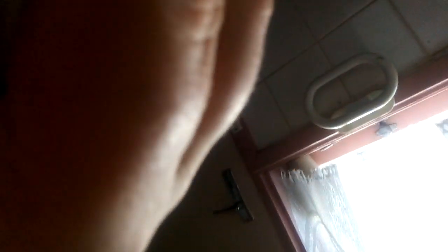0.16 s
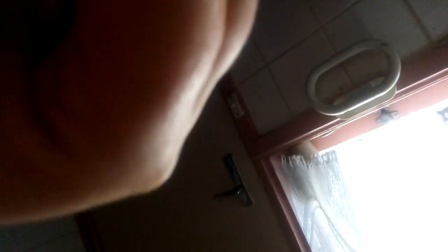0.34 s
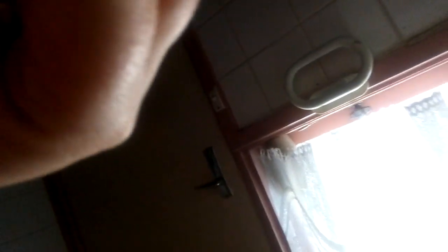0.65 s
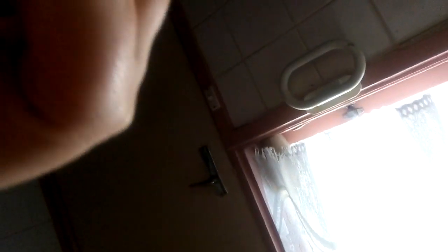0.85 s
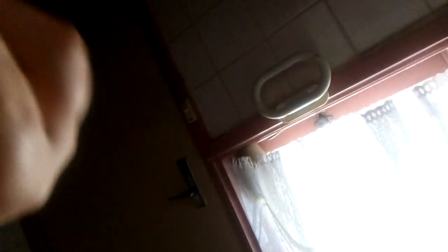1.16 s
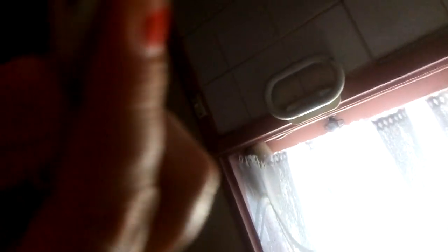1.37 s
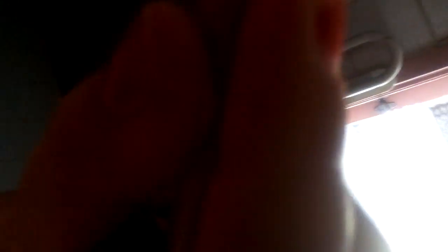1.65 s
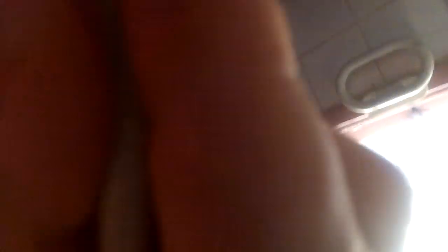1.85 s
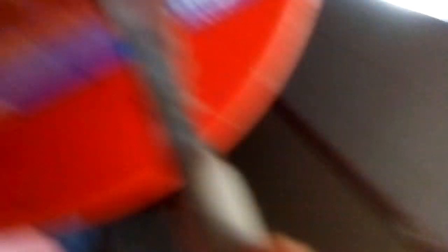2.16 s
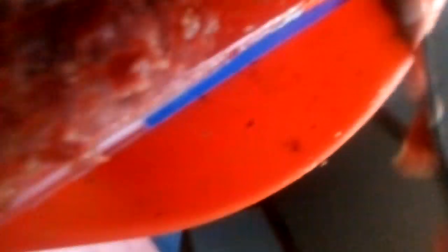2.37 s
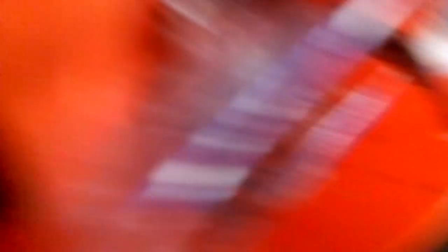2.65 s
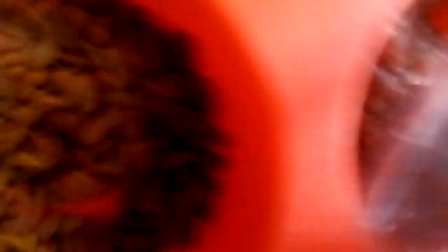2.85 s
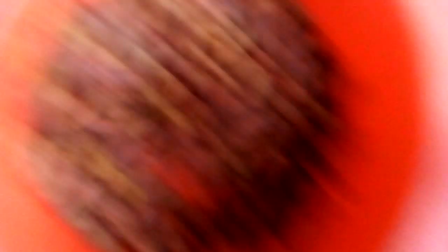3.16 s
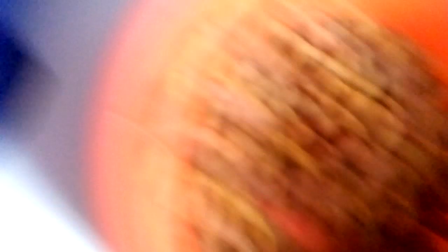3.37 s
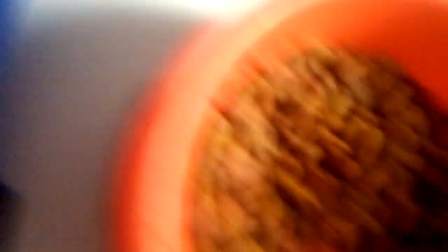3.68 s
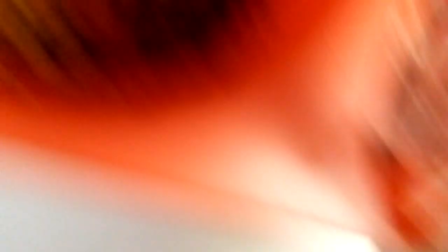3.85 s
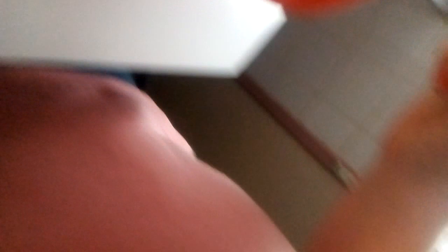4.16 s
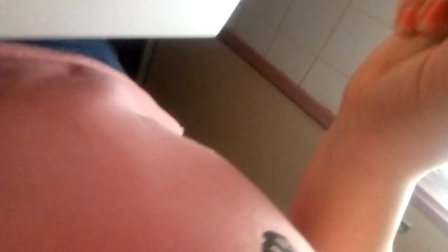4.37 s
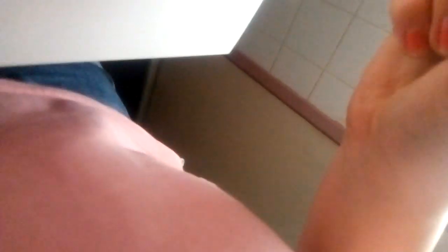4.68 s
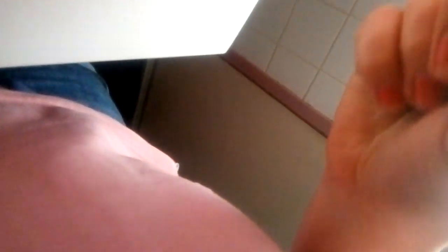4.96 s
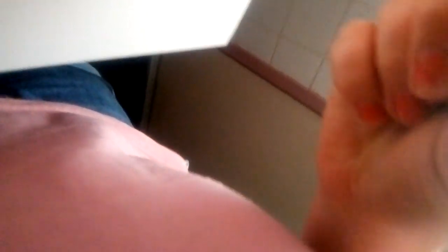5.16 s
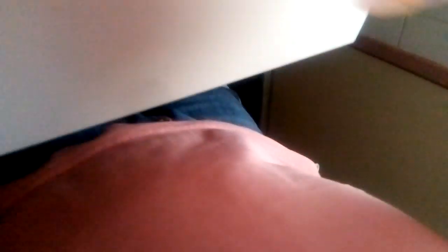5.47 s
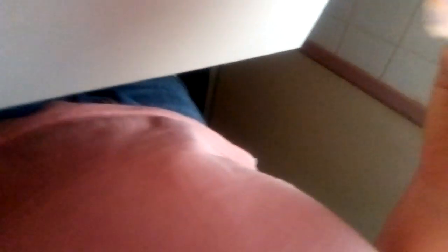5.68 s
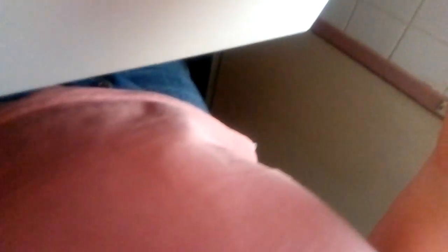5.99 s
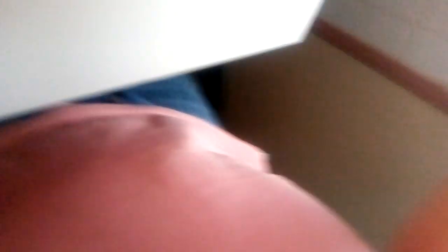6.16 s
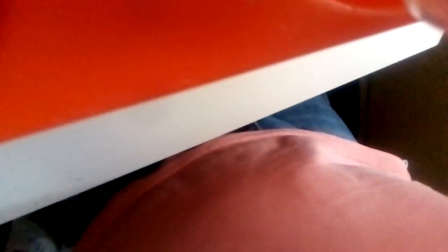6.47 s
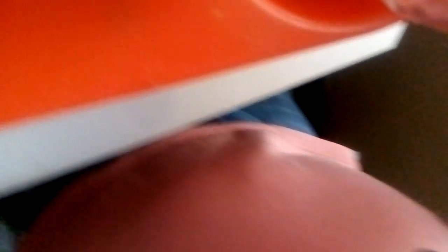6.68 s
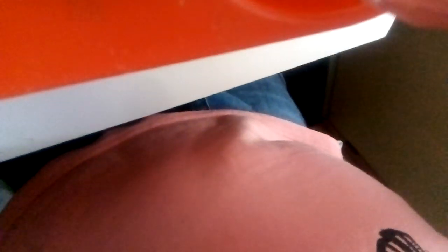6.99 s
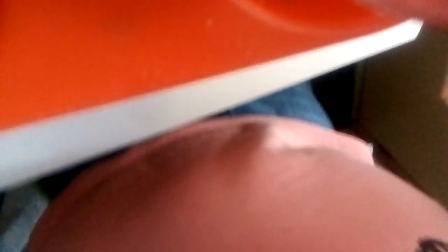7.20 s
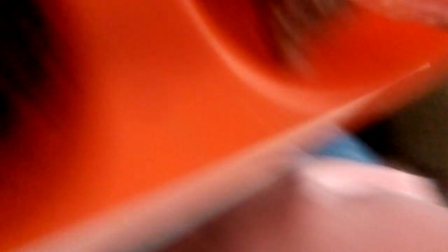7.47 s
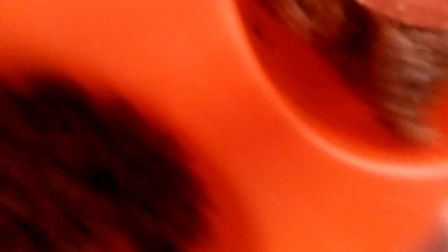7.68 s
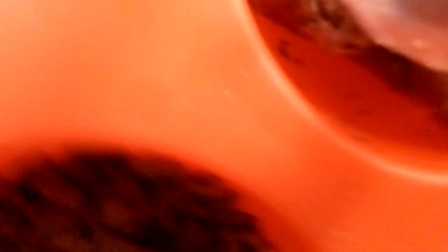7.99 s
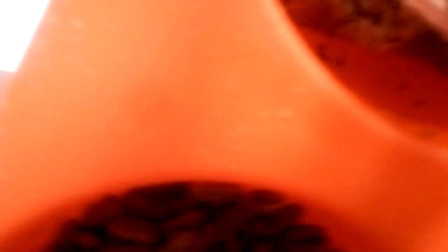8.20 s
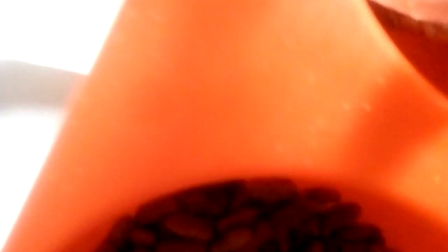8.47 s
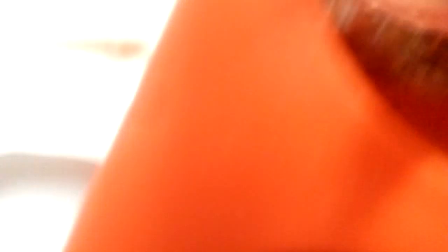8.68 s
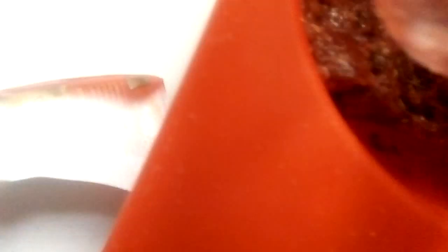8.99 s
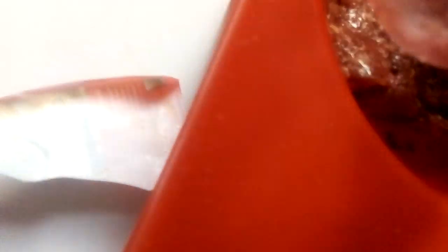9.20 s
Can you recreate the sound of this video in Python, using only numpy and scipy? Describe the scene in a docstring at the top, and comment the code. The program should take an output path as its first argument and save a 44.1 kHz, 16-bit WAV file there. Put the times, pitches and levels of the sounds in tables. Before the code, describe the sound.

Close, irregular clacks and gritty scrapes of metal on food-smeared plastic, busy at first, then sparser, with low bumps on the recorder.

```python
"""A metal utensil digs wet food into a plastic bowl, close by, in a small tiled kitchen.
Scrapes are tiny random slips through hollow, wall and grit colours; knocks ring the damped modes.
Bright rasps are filtered noise; squeaks and wet plops are wavering tones with a noisy edge.
The hand-held recorder is jostled: dull bumps of low, grainy noise, mostly on the left.
Around it all lie a short room tail, a soft noise floor, very high hiss and a thin electronic whine."""
import sys
import numpy as np
from scipy import signal
from scipy.fft import rfft, irfft
from scipy.io import wavfile
from scipy.ndimage import map_coordinates

SR = 44100
rng = np.random.default_rng(int(sys.argv[2]) if len(sys.argv) > 2 else 0)


def wav_record(signal):
    """Record a signal, one row per channel, as 16-bit PCM in the file named by sys.argv[1]."""
    frames = np.transpose(np.atleast_2d(signal))
    bounded = np.clip(frames, -1, 1)
    # unit amplitude maps onto the largest positive 16-bit level
    quanta = np.round(bounded * 32767).astype(np.int16)
    wavfile.write(sys.argv[1], SR, quanta)


N = 411894
TIME = np.arange(N) / SR

# utensil knocks: (time [s], level [dB], brightness [dB per octave], extra ring of wall and rim [dB],
# left over right [dB])
KNOCKS = [(0.0317, -30.5, 2.5, 0, -1.5), (0.0531, -21, 0, -8, 6.5), (0.0938, -27, 0, -4, 10.5),
          (0.1865, -38, 5, -3.5, 4), (0.4581, -29, 4, -2.5, 4.5), (.559, -32.5, 5, -8, 8),
          (0.5992, -31.5, 2.5, -2, 7), (0.6085, -25, 2.5, -2, 9), (0.628, -30.5, -1.5, -2.5, 9),
          (.7098, -29.5, 7, -5, 8), (0.721, -23.5, -0.5, -1.5, 10), (0.8377, -41, -7, -5, 8),
          (.8953, -35.5, 2.5, 3.5, 7), (0.9227, -26.5, -1.5, -4, -0.5), (1.2651, -45, -0.5, 3.5, 5),
          (1.456, -25.5, -.5, 1.5, 6), (1.53, -36.5, 2.5, 2.5, 15.5), (1.6053, -36.5, 3.5, -1, 4),
          (1.7371, -31, 1.5, 0.5, -5), (1.759, -32, -3, -2.5, 8), (1.7687, -41.5, -3, 10, 15),
          (1.7943, -36.5, -4, 4.5, 11), (1.8412, -32.5, 6, 3.5, 16), (1.9643, -35.5, 2.5, 4, 9.5),
          (2.1476, -31, -2.5, 0.5, 11), (2.264, -41, 0, 2.5, 14), (2.3378, -29, 3.5, -2, 2.5),
          (2.441, -27, 0.5, -0.5, 11), (2.475, -35, -2, -12, 8), (2.643, -30.5, 2, -2.5, 0),
          (2.8668, -40.5, 6.5, 7.5, -1), (4.0156, -26.5, 1.5, 3, 2), (4.0542, -36, 4.5, 6.5, 4.5),
          (4.2324, -42, 3.5, 1.5, 1), (4.302, -46.5, 2.5, 4, 4), (4.4047, -32.5, 4, 0.5, 9),
          (4.5536, -38, 1, 5.5, 6), (4.6236, -28, 3, -5.5, 4.5), (4.6703, -29, 1, 10, 7),
          (4.7198, -39, -5, 5, 2.5), (4.8762, -52.5, -1.5, 10.5, 8), (5.0214, -33.5, -1.5, -6, 6),
          (5.099, -39.5, -3.5, -11, 13), (5.4576, -39, -1.5, -1.5, 4), (5.666, -45.5, -2, 2, 3),
          (5.6914, -33.5, -9, 5.5, 3.5), (5.7484, -48.5, -3, 8.5, -5), (5.765, -48, 5.5, 7, -1),
          (6.1402, -29.5, .5, 8, 1), (6.2811, -33.5, -2.5, 1.5, 0.5), (6.5, -45, -4.5, 3.5, 10),
          (6.5821, -35, -4, 2, 1.5), (6.976, -27.5, 1, 5, -6.5), (7.5172, -45, -3.5, 10, -4.5),
          (7.8151, -52.5, -0.5, 5.5, -9), (8.2494, -41.5, -3, 8, -3), (8.278, -53.5, -9, -11, 1),
          (8.3037, -48.5, -2, 3, -2), (8.3447, -49, .5, 7, 1), (8.4196, -53.5, -2, 8, 4),
          (8.7495, -34.5, -2, -2, -4), (8.807, -31.5, 1, 2, 0.5), (8.928, -25.5, -1.5, 5.5, 0),
          (8.99, -36.5, 1, 3, -8), (9.008, -35, 2, 1, -13), (9.255, -62, -5, 3, 0),
          (9.315, -25, 1.5, 2.5, -8.5)]
# bowl and utensil, damped by food and hand: (frequency [Hz], width [Hz], level [dB])
MODES = [(330, 100, -1.5), (523, 170, -2), (710, 170, 1.5), (980, 230, 0.5), (1355, 280, -0.5),
         (1726, 240, 2), (2272, 300, -1.5), (2832, 490, -3.5), (3690, 510, -0.5), (4307, 420, -3.5),
         (4820, 400, -2.5), (5537, 430, 1.5), (6440, 370, 1), (7190, 800, -6), (9260, 1800, -15),
         (14600, 2100, -20)]


def from_db(db):
    """Decibels to gain."""
    return 10 ** (np.asarray(db) / 20)


def rms_one(x):
    """Scale to an overall rms of 1."""
    return x / np.sqrt(np.mean(x ** 2) + 1e-20)


def in_time(rows):
    """The columns of an automation curve, at every sample."""
    s, *columns = np.transpose(rows)
    return [np.interp(TIME, s, column) for column in columns]


def add(out, s, sound):
    """Mix a sound, one row per channel, in at time s."""
    at = max(0, round(s * SR))
    out[:, at:at + sound.shape[1]] += sound[:, :max(0, N - at)]


def panned(db):
    """Left and right gains of mean power 1."""
    return rms_one(from_db(np.array([[db], [-db]]) / 2))


def resonate(x, hz, width_hz):
    """A two-pole resonance with a gain of about 1 on top."""
    r = np.exp(-np.pi * width_hz / SR)
    zeros = np.array([1, 0, -1]) * (1 - r * r) / 2
    poles = [1, -2 * r * np.cos(2 * np.pi * hz / SR), r * r]
    return signal.lfilter(zeros, poles, x + 1e-18)


def coloured(x, spectrum):
    """Causal (minimum-phase) filter with the given spectrum and steep skirts; rms 1."""
    hz, db = np.transpose(spectrum)
    size = 4096
    octave = np.log2(np.maximum(np.fft.rfftfreq(size, 1 / SR), 1))
    outside = np.abs(octave - np.clip(octave, np.log2(hz[0]), np.log2(hz[-1])))
    skirt_db = 20 * np.minimum(2 * outside, 2)
    target_db = np.interp(octave, np.log2(hz), db) - skirt_db
    # fold the cepstrum forward in time to get minimum phase
    cepstrum = irfft(np.log(from_db(target_db)))
    cepstrum[1:size // 2] *= 2
    cepstrum[size // 2 + 1:] = 0
    response = irfft(np.exp(rfft(cepstrum)))
    return rms_one(signal.oaconvolve(x, response[None], axes=1)[:, :N])


def two_ports(x, alike):
    """Two unrelated signals become left and right: one with opposite polarity, one in phase."""
    alike = np.clip(alike, 0, 1)
    opposed = np.sqrt((1 + alike) / 2) * x[0] * [[1], [-1]]
    return opposed + np.sqrt((1 - alike) / 2) * x[1]


def flicker(rate, spread_db):
    """A gain that wanders at random through `rate` points a second; the points have mean power 1."""
    knots = rms_one(from_db(spread_db * rng.standard_normal(4096)))
    return np.interp(TIME * rate, np.arange(len(knots)), knots)


def grains(per_s, spread_db):
    """Random tiny slips of uneven size, differing in strength and sign between two channels; rms 1."""
    chance = np.broadcast_to(per_s / SR, N)
    draw, size, sign = rng.random(N), rng.random(N), rng.random((2, N))
    at = np.flatnonzero(draw < chance)
    strength = from_db(spread_db * np.minimum(-np.log(size[at]), 3.5))
    out = np.zeros((2, N))
    out[:, at] = (sign[:, at] - .5) * strength / np.sqrt(chance[at])
    return rms_one(out)


def gesture(length, attack_s, release_db_per_s, swell_db=0):
    """Envelope of one push: it rises, holds while swelling or easing, and dies away."""
    t = TIME[:round((abs(length) + .2) * SR)]
    hold_db = swell_db * (np.minimum(t / length, 1) - .5)
    release_db = release_db_per_s * np.maximum(t - length, 0)
    return np.minimum(t / attack_s, 1)[None] * from_db(hold_db - release_db)


def stroke_gains():
    """Strength of the hollow, wall and grit parts of the scrape: strokes over a faint rustle."""
    # strokes through the food: (time [s], length [s], wall level [dB], hollow against wall [dB],
    # grit against wall [dB], swell from start to end [dB])
    strokes = [(0, .11, -33, -1.5, -2, -5.5), (0.258, 0.066, -58, 9.5, -20, -6.5),
               (.385, 0.17, -52.5, 6.5, -7.5, -2), (.565, 0.15, -42.5, 1, 1.5, 13),
               (0.731, .07, -52, 6, -5.5, -11), (0.906, .04, -41.5, 3.5, 2, -5.5),
               (0.974, 0.12, -36, -5, -9, -9.5), (1.105, 0.16, -59.5, -4, 2.5, -5.5),
               (1.445, .11, -48, 0, -3, -0.5), (1.72, .085, -42.5, -4, -3, -0.5),
               (1.858, .2, -45, -3.5, -4, -7.5), (2.119, .055, -43, -1.5, -1, -10.5),
               (2.309, 0.069, -54, 13.5, 10, -8.5), (2.442, .19, -44.5, -2, 4.5, -0.5),
               (2.633, .07, -56.5, -3, 7, -7), (2.737, .16, -50.5, 1, 6.5, -2.5),
               (2.949, 0.17, -52, 0, 4.5, 1), (3.186, 0.043, -60, 1, 6, -6),
               (3.792, .17, -76.5, -1, 8.5, 0), (4.017, 0.11, -52.5, -1.5, -1, -1),
               (4.118, 0.046, -39, 3, 4.5, -6), (4.227, 0.071, -45.5, -15, -0.5, -2),
               (4.414, 0.084, -41.5, -14.5, 8, -6), (4.519, .07, -54.5, -3, 0.5, -1.5),
               (4.592, 0.037, -40, 0.5, 1, -5.5), (4.687, .08, -52, -3, 5, 8.5), (4.8, 0.25, -55, -6, 0, 4),
               (4.982, .035, -45, -1.5, 1, 7), (5.03, .07, -50, -1, 0, -3),
               (5.226, 0.055, -57.5, 3.5, -4, 1), (5.297, .17, -45.5, -3.5, 1, -11),
               (5.515, .13, -57, -13, 4.5, -1), (5.701, 0.15, -61, 2, -3.5, -2.5),
               (5.923, 0.13, -59, -4, 6.5, -12.5), (6.337, 0.044, -43, -0.5, 0.5, 10),
               (6.394, 0.16, -49.5, -14, -14, 0), (6.509, 0.025, -44, -2, -5, 7),
               (6.581, 0.098, -57, -5, -5, -5), (6.79, .085, -61, -15, -4.5, 6.5),
               (6.916, .03, -64, 5, -20, -0.5), (6.978, .06, -54, 3.5, -12, 0.5),
               (7.044, .03, -41.5, -11, 4.5, -3), (7.07, 0.022, -43.5, -3, -17, -2),
               (7.188, .04, -55, 1.5, 3, 0.5), (7.257, 0.14, -43.5, -4, -8, 3.5),
               (7.528, .06, -44, -10, -3, -0.5), (7.64, .04, -48.5, -6, -17, 1.5),
               (7.726, .095, -55, -6, -8, 2.5), (7.85, .18, -56, -8, -11, 3.5),
               (8.119, .11, -61, -16, -0.5, 7), (8.221, .035, -51.5, -5, -9, 6),
               (8.637, .09, -54, 1, -4.5, 2.5), (8.75, 0.14, -48, 1.5, 2, -1.5),
               (8.909, .105, -47, -2, -5, -11), (9.315, 0.027, -51.5, 11.5, 13, -6)]
    # faint rustle of the food beneath the strokes: (time [s], level [dB])
    rustle_curve = [(0, -45.5), (.33, -67.5), (.75, -59.5), (1.42, -72), (1.55, -53), (2.2, -62),
                    (2.7, -58.5), (3.35, -72.5), (3.55, -88.5), (4.3, -70.5), (4.7, -59), (5.2, -64),
                    (6.05, -67.5), (6.25, -57), (6.75, -76), (7.15, -60), (7.48, -78.5), (9.3, -84.5)]
    # rustle offset of the hollow, wall and grit parts: (level [dB])
    rustle_parts_db = [-1.5, 0.5, 0]
    attack_s, release_db_per_s = 0.011, 521
    rustle, = in_time(rustle_curve)
    power = from_db(rustle + np.array(rustle_parts_db)[:, None]) ** 2
    for s, length, db, hollow_db, grit_db, swell_db in strokes:
        parts = from_db(db + np.array([[hollow_db], [0], [grit_db]]))
        add(power, s, (parts * gesture(length, attack_s, release_db_per_s, swell_db)) ** 2)
    return np.sqrt(power)


def scraping(strokes, hollow_db=-1, wall_db=-1, grit_db=-1, slips_per_s=1300, spread_db=3.5,
             judder_db=4.5, clump_db=2.27, smear=.5, catch_db=-6, alike=0.23):
    """The blade slips in tiny jerks, faster when pressed harder; wet food smears them into a hiss."""
    # colours of the three parts: (frequency [Hz], density [dB per Hz])
    hollow_colour = [(250, -9.5), (380, -4), (600, -1), (1000, -6.5), (1300, -12.5)]
    wall_colour = [(900, -15.5), (1200, 1.5), (1720, 3.5), (2200, 0.5), (3000, -3), (3800, -13.5)]
    grit_colour = [(2600, -22), (3400, -5), (4400, -0.5), (5600, 0.5), (6700, 1.5), (8000, -6.5),
                   (10500, -15), (15500, -23)]
    hollow, wall, grit = 20 * np.log10(strokes)
    gains = from_db([hollow + hollow_db, wall + wall_db, grit + grit_db])
    per_s = np.clip(slips_per_s * from_db(.7 * (wall + 51)), 1200, 12000)
    slips = grains(per_s, spread_db) + smear * rng.standard_normal((2, N))
    friction = two_ports(slips, alike) * flicker(130, judder_db)
    rub = sum(gain * flicker(45, clump_db) * coloured(friction, colour)
              for gain, colour in zip(gains, (hollow_colour, wall_colour, grit_colour)))
    # coarser catches each ring one mode, so the rasp keeps changing colour
    catches, dealt = grains(per_s / 2, 3.5), rng.integers(0, len(MODES), N)
    rings = np.zeros((3, 2, N))
    for k, (hz, width_hz, db) in enumerate(MODES):
        part = np.searchsorted([1100, 3200], hz)   # hollow, wall or grit
        ring = resonate(catches * (dealt == k), hz, width_hz * .6)
        rings[part] += from_db(db) / np.sqrt(width_hz) * ring
    caught = sum(gain * rms_one(ring) for gain, ring in zip(gains, rings))
    return 0.77 * rub + from_db(catch_db) * caught


def handling(rumble_db=0, left_db=9, alike=0.39):
    """Fingers shift on the case and knocks thump the table: dull bumps, mostly at the left port."""
    # steady rumble of the grip: (time [s], level [dB])
    grip = [(0, -58.5), (.9, -47.5), (1.35, -62), (1.55, -54.5), (2.3, -51), (2.65, -53.5), (3.15, -59.5),
            (3.6, -84), (4.3, -78), (4.65, -55), (5.7, -67), (6.3, -55.5), (6.75, -71), (7.1, -55.5),
            (7.5, -70), (7.8, -61), (8.5, -87.5), (9.3, -81.5)]
    # fingers bump the case: (time [s], length [s], level [dB])
    finger_bumps = [(0, 0.12, -32.5), (0.604, 0.12, -36), (0.784, 0.015, -41), (0.914, 0.013, -36),
                    (1.041, .02, -49), (1.606, 0.017, -41.5), (1.769, 0.04, -32), (2.128, .045, -34),
                    (2.356, 0.026, -41), (2.435, 0.043, -33.5), (2.539, 0.056, -42.5),
                    (2.757, 0.056, -37.5), (3.054, 0.017, -40), (4.165, 0.034, -51), (5.015, 0.034, -41.5),
                    (5.245, 0.019, -48), (5.387, 0.031, -43.5), (5.927, 0.014, -45), (6.278, 0.012, -32.5),
                    (6.34, 0.059, -53), (6.536, 0.059, -46.5), (7.026, 0.061, -51), (7.193, .02, -49),
                    (7.257, 0.165, -57), (8.269, 0.04, -50), (8.742, 0.1, -45.5)]
    # colour of rumble and bumps: (frequency [Hz], density [dB per Hz])
    rumble_colour = [(25, -13.5), (45, -14), (75, -4.5), (120, -0.5), (210, -1.5), (320, -7.5), (480, -21)]
    attack_s, release_db_per_s = .008, 562.5
    thump_db, thump_s = -11, 0.0084   # against the knock; bright knocks thump less
    power = from_db(in_time(grip)) ** 2
    thumps = []
    for s, db, brightness_db, ring_db, pan_db in KNOCKS:
        lowest_db = group_levels(db, brightness_db, ring_db)[0]
        thumps.append((s, thump_s, min(db, lowest_db) + thump_db))
    for s, length, db in finger_bumps + thumps:
        add(power, s, (from_db(db) * gesture(length, attack_s, release_db_per_s)) ** 2)
    texture = two_ports(grains(900, 0.94) + .5 * rng.standard_normal((2, N)), alike)
    return from_db(rumble_db) * np.sqrt(power) * panned(left_db) * coloured(texture, rumble_colour)


def background():
    """Still room air, a narrow band of very high hiss and a thin electronic whine."""
    # colour of the air: (frequency [Hz], density [dB per Hz])
    air_colour = [(30, -3), (120, 4.5), (300, -0.5), (1000, -15), (2500, -18), (6500, -18), (10000, -25),
                  (13500, -27.5), (15000, -15)]
    # pitch of the whine: (time [s], fundamental [Hz])
    whine_pitch = [(0, 3589.5), (3.3, 3589.5), (3.72, 3697), (5.5, 3626.5), (7.4, 3590.5), (7.5, 3697.5),
                   (8.4, 3541), (9.3, 3582.5)]
    # partials of the whine: (multiple of the fundamental, level [dB])
    whine_orders = [(2, -81.5), (3, -81), (4, -82.5)]
    # silence in the whine: (start [s], end [s])
    whine_pause = (3.32, 3.71)
    air_db, hiss_db, hiss_hz = -68, -81, 15000
    hz, = in_time(whine_pitch)
    running = (TIME < whine_pause[0]) | (TIME > whine_pause[1])
    phase = 2 * np.pi * np.cumsum(hz) / SR
    whine = running * sum(from_db(db) * np.sqrt(2) * np.sin(round(k) * phase) for k, db in whine_orders)
    narrow = resonate(rng.standard_normal((2, N)), hiss_hz, 1000)
    hiss = flicker(8, 2) * rms_one(resonate(narrow, hiss_hz, 1000))
    air = coloured(rng.standard_normal((2, N)), air_colour)
    return from_db(air_db) * air + from_db(hiss_db) * hiss + whine


def rasps():
    """Short strokes of flickering noise that hiss right up into the top octave."""
    # quick bright rasps: (time [s], length [s], level [dB])
    rasp_strokes = [(0.023, 0.087, -48.5), (0.662, .04, -35.5), (2.5, 0.17, -48), (3.382, 0.066, -50),
                    (4.407, 0.1, -47), (5.3, 0.068, -45), (5.537, 0.14, -49), (7.227, 0.16, -42.5)]
    # their colour: (frequency [Hz], density [dB per Hz])
    rasp_colour = [(3800, -11), (6300, 3), (8000, -6), (11000, -11.5), (13500, -7.5), (14600, 3.5),
                   (15400, 4.5), (16000, -20.5)]
    level = np.zeros((1, N))
    for s, length, db in rasp_strokes:
        add(level, s, from_db(db) * signal.windows.tukey(round(length * SR), .5)[None])
    return level * coloured(rng.standard_normal((2, N)) * flicker(300, 4.6), rasp_colour)


def group_levels(db, brightness_db, ring_db):
    """Level of each group of modes in one knock: brightness tilts them, ring lifts the middle ones."""
    # hollow, wall, rim and edge modes: (distance from mid range [octaves], share of the extra ring)
    mode_groups = [(-1.85, 0), (-0.75, 1.34), (0.8, 0.76), (1.9, 0)]
    octaves, share = np.transpose(mode_groups)
    return db + brightness_db * octaves + ring_db * share


def knocks(rows, chatter=0.33, detune=0.076, uneven_db=3, alike=0.34, group_db=(-2, -2, -2, -2)):
    """A hard contact and a few ms of chatter ring the modes; each spot on the wall rings differently."""
    # borders between the groups of modes: (frequency [Hz])
    group_borders_hz = [1100, 2600, 4500]
    contact_at_neutral_ms, halving_db = 4.23, 9   # half as long for this much more brightness
    out, ms = np.zeros((2, N)), np.arange(1024) / SR * 1000
    groups = np.searchsorted(group_borders_hz, [hz for hz, width, db in MODES])
    edges = [150, *group_borders_hz, 13000]
    bands = [signal.butter(2, [low * .8, high * 1.1], "band", fs=SR)
             for low, high in zip(edges, edges[1:])]
    span = .005 * SR   # a level means the ring's energy spread over 5 ms
    for s, level_db, brightness_db, ring_db, pan_db in rows:
        levels = group_levels(level_db, brightness_db, ring_db)
        contact_ms = contact_at_neutral_ms * .5 ** (brightness_db / halving_db)
        noise = two_ports(rng.standard_normal((2, len(ms))), alike)
        force = chatter * (contact_ms / 4) * noise * np.exp(-ms / (0.35 * contact_ms))
        force[:, 0] += [1, -1]   # the hard contact
        rings = np.zeros((len(levels), 2, len(ms)))
        for k, (hz, width_hz, db) in enumerate(MODES):
            strength = from_db(db + uneven_db * (2 * rng.random((2, 1)) - 1)) * (-1) ** k
            spot_hz = hz * np.exp(detune * (2 * rng.random() - 1))
            rings[groups[k]] += strength * resonate(force, spot_hz, width_hz)
        for db, trim, ring, band in zip(levels, group_db, rings, bands):
            ring = signal.lfilter(*band, ring)
            energy = np.sum(ring ** 2, axis=1, keepdims=True)
            strength = from_db(db + trim) / np.sqrt(energy / span)
            add(out, s, panned(pan_db) * strength * ring)
    return out


def light_taps(wall_gain, bearing):
    """Random small knocks that follow the scraping level of the moment; rows like those of KNOCKS."""
    taps_per_s, over_scrape_db, spread_db = 9, 2.5, 2
    draws = rng.random((200, 4))
    times = np.cumsum((.5 + draws[:, 0]) / taps_per_s)
    rows = []
    for s, (size, brightness, ring) in zip(times, 2 * draws[:, 1:] - 1):
        if s < TIME[-1]:
            at = int(s * SR)
            db = 20 * np.log10(wall_gain[at]) + over_scrape_db + spread_db * size
            rows.append((s, db, spread_db * brightness, spread_db * ring, bearing[at]))
    return rows


def tones(rows, waver, glide, rough):
    """Short swells of a wavering, falling sine with a noisy edge; they rise fast and fade."""
    out = np.zeros((2, N))
    for s, length, hz, db in rows:
        age = TIME[:SR // 5] / length
        wobble = rms_one(resonate(rng.standard_normal(len(age)), 120, 300))
        pitch = hz * (1 + waver * wobble) * np.exp(-glide * np.minimum(age, 2))
        phase = 2 * np.pi * np.cumsum(pitch) / SR
        noise = rng.standard_normal((2, len(age)))
        edge = rms_one(resonate(resonate(noise, hz, hz / 2), hz, hz / 2))
        swell = np.minimum(age * 6, 1) * np.exp(-age ** 2)
        body = np.sin(phase + np.array([[0], [1]]))   # right is one radian ahead
        add(out, s, from_db(db) * swell * (body + rough * edge))
    return out


def squeaks():
    """The blade sticks and slips along the wall: brief, fairly steady tones."""
    # squeaks: (time [s], length [s], starting pitch [Hz], level of the swell [dB])
    squeak_rows = [(.255, 0.067, 1150, -48), (.676, 0.0077, 2510, -15), (.677, .015, 3285, -24),
                   (.999, 0.018, 1737, -18), (1.08, .025, 1510, -41), (1.865, 0.028, 1646, -35),
                   (3.26, 0.11, 1500, -68), (4.913, .008, 2710, -31), (4.953, .007, 2740, -26),
                   (6.425, 0.029, 1870, -42.5), (7.548, 0.027, 1703, -39)]
    return tones(squeak_rows, waver=.03, glide=0.02, rough=.45)


def plops():
    """Wet lumps let go and land: a cavity tone that wavers widely, falls and is half noise."""
    # plops: (time [s], length [s], starting cavity pitch [Hz], level of the swell [dB])
    plop_rows = [(4.133, 0.023, 680, -32.5), (4.159, 0.036, 611, -30.5), (5.69, .005, 980, -23.5),
                 (6.583, 0.011, 760, -30)]
    return tones(plop_rows, waver=.23, glide=.1, rough=1)


def kitchen(x, early_db=-15, early_s=0.0039, tail_db=-17):
    """Quick reflections from the table and the body, then the diffuse tail of the tiled room."""
    t60_s, wall_cut_hz = 0.28, 8400
    t = TIME[:SR // 2]
    dull = signal.butter(2, wall_cut_hz, fs=SR, output="sos")
    early, late = signal.sosfilt(dull, rng.standard_normal((2, 2, len(t))))
    early = early * (t > .002) * np.exp(-t / early_s)
    late = late * (t > .006) * from_db(-60 * t / t60_s)
    response = from_db(early_db) * rms_one(early) + from_db(tail_db) * rms_one(late)
    return signal.oaconvolve(x, response / np.sqrt(len(t)), axes=1)[:, :N]


def scene():
    """The work at the bowl in its room, plus the recorder's own noises."""
    # where the bowl lies as the recorder turns: (time [s], left over right [dB])
    bearing_curve = [(0, 4.5), (1.2, 9.5), (2.1, 10.5), (2.8, -.5), (4, 3.5), (5.2, 6.5), (6, 2), (6.8, -1),
                     (8, -4), (9.3, 0.5)]
    lag_s, lag_s_per_db = .00008, .00003
    bearing, = in_time(bearing_curve)
    sides = from_db(np.array([bearing, -bearing]) / 2)
    sides = sides / np.sqrt(np.mean(sides ** 2, axis=0))
    strokes = stroke_gains()
    rubbing = scraping(strokes) + rasps() + squeaks() + plops()
    left, right = knocks(KNOCKS + light_taps(strokes[1], bearing)) + sides * rubbing
    # the further left the bowl lies, the later it reaches the right port
    lag = (lag_s + lag_s_per_db * bearing) * SR
    bowl = np.array([left, map_coordinates(right, [np.arange(N) - lag], order=3)])
    return bowl + kitchen(bowl) + handling() + background()


def record(dry):
    """The microphone dulls the top octave; the band ends steeply."""
    cutoff_hz = 16300
    dull = dry - 0.39 * resonate(dry, 11420, 4000)
    return signal.sosfilt(signal.ellip(8, .3, 95, cutoff_hz, fs=SR, output="sos"), dull)


dry = scene()
out = record(dry)
wav_record(out)
```